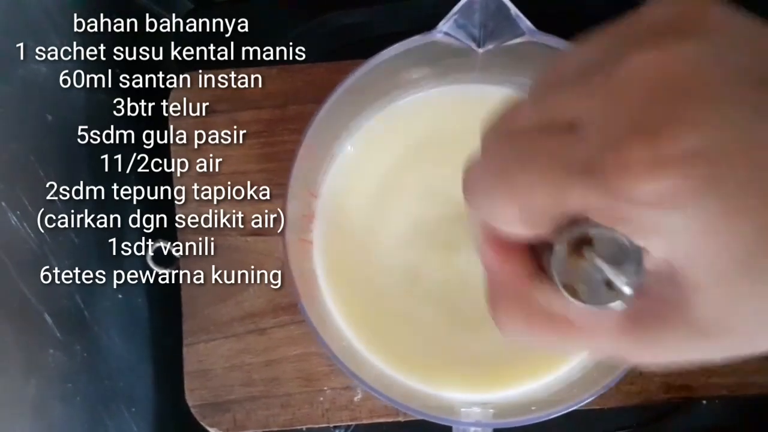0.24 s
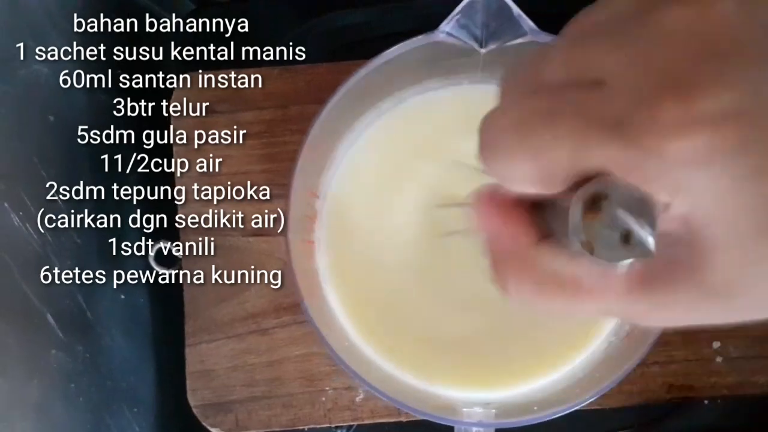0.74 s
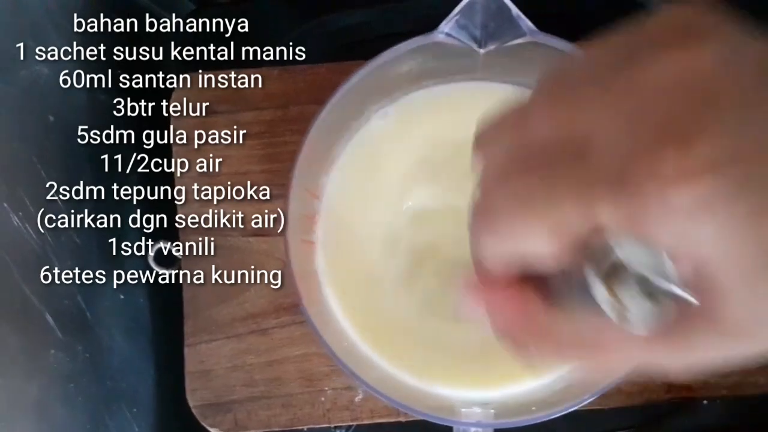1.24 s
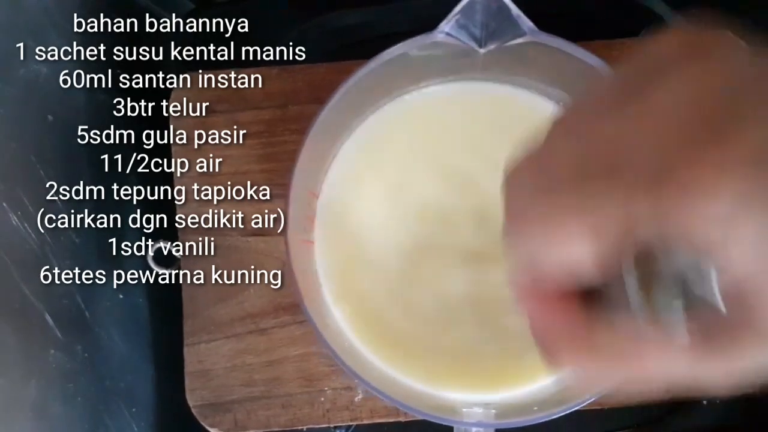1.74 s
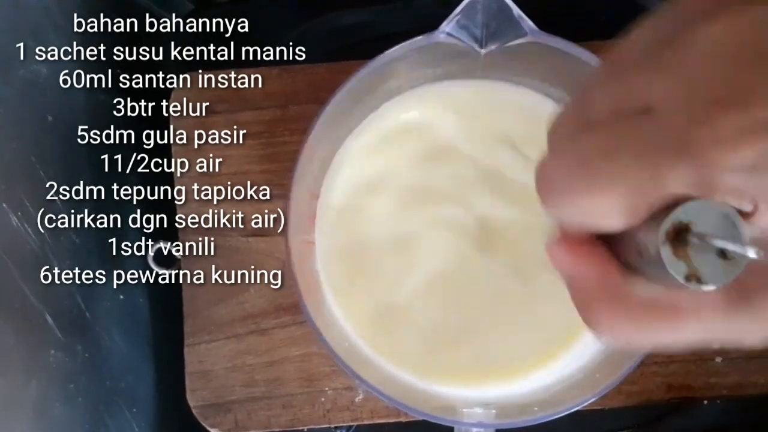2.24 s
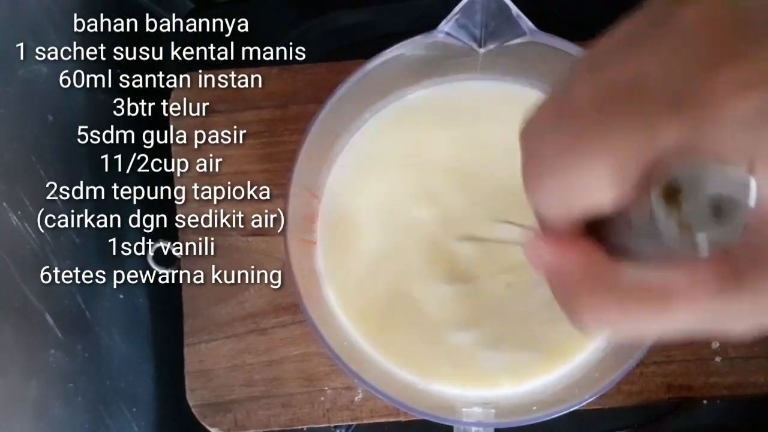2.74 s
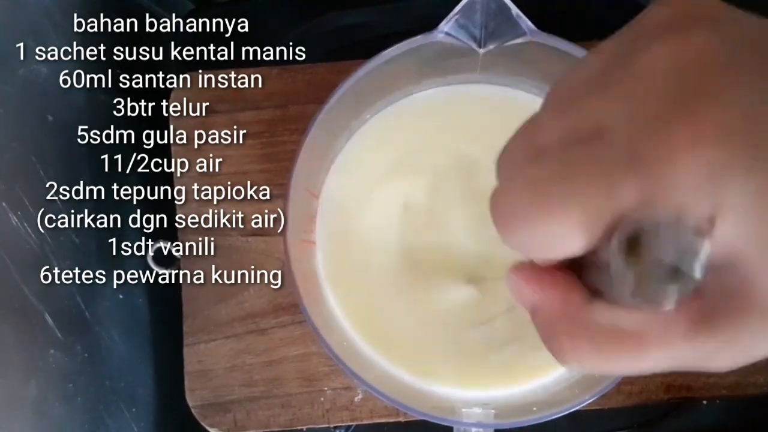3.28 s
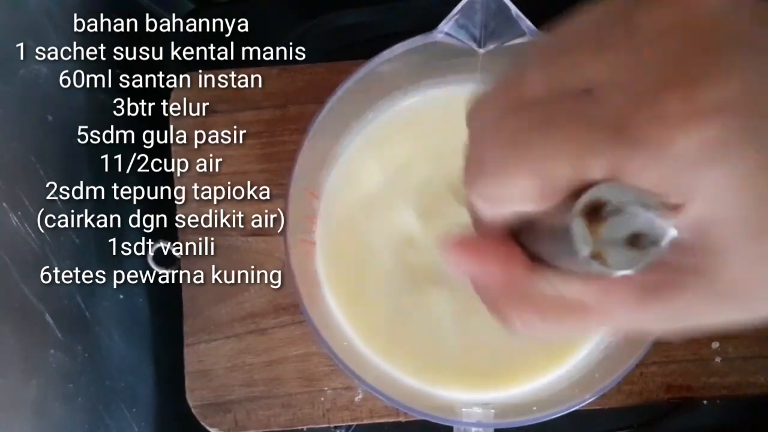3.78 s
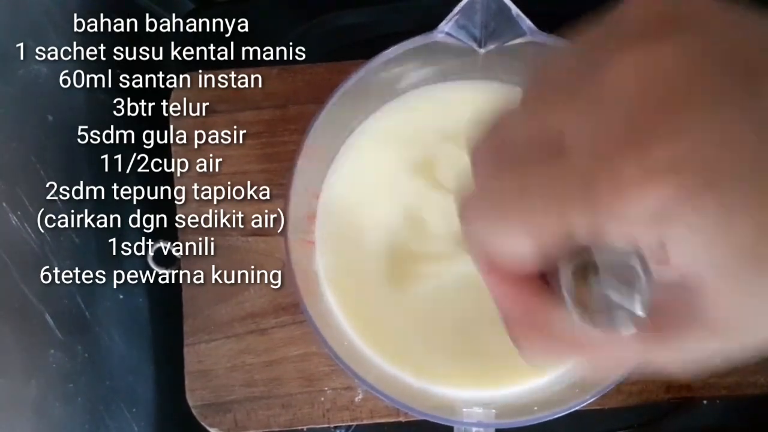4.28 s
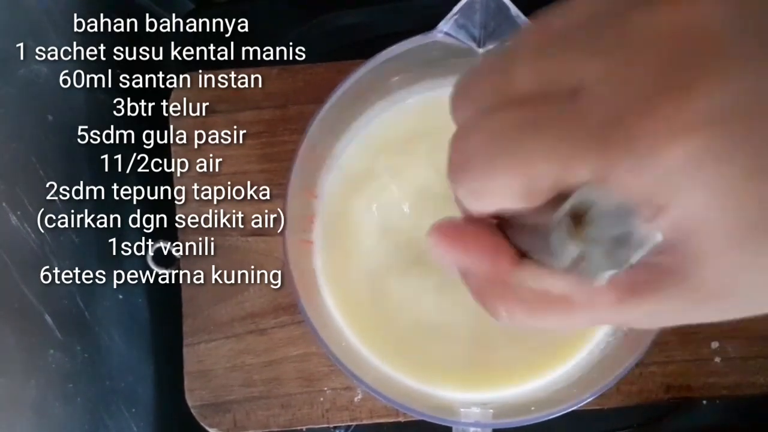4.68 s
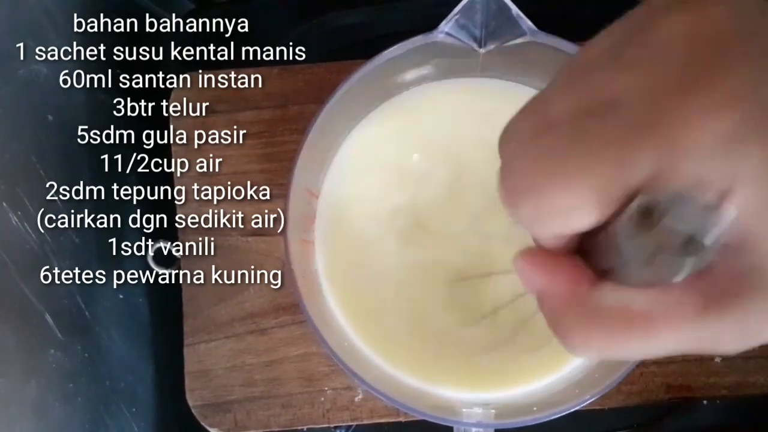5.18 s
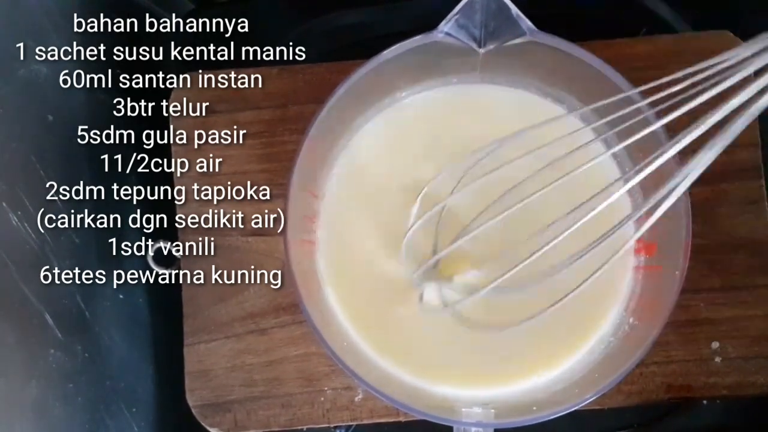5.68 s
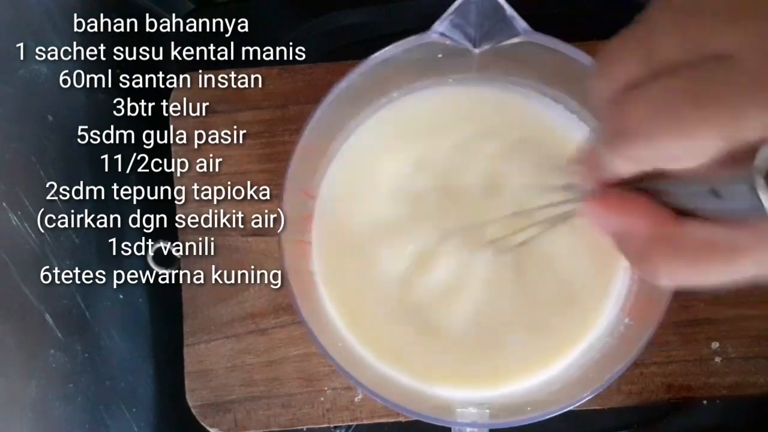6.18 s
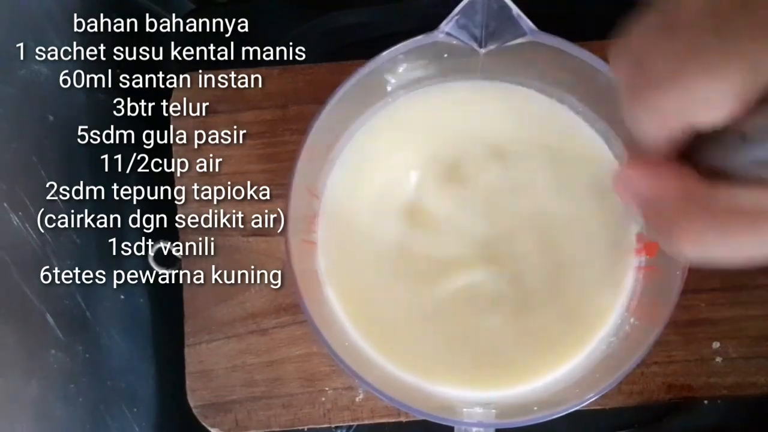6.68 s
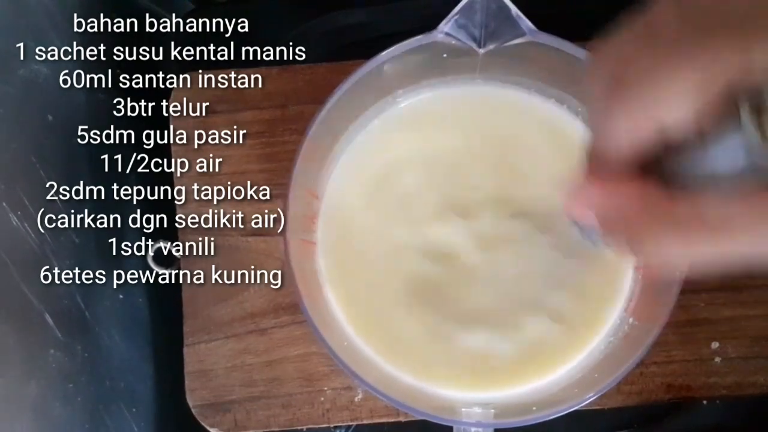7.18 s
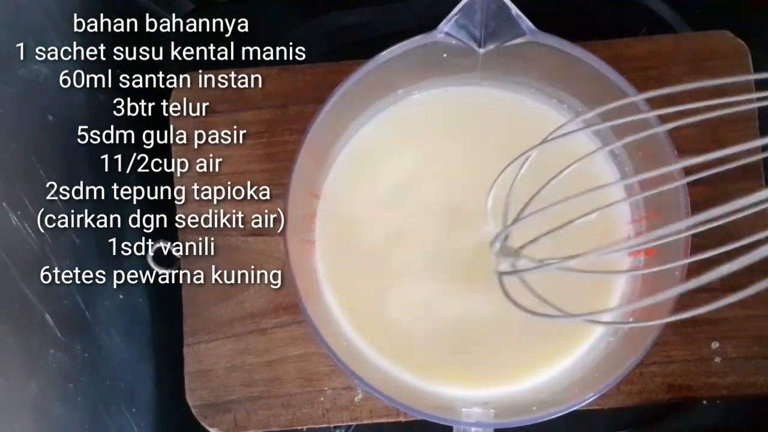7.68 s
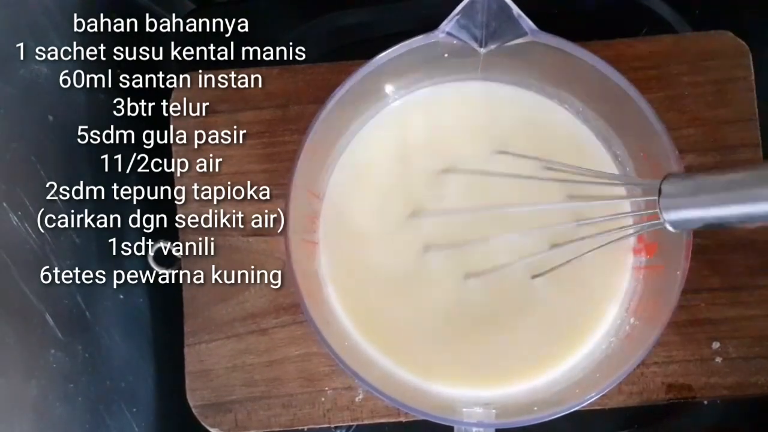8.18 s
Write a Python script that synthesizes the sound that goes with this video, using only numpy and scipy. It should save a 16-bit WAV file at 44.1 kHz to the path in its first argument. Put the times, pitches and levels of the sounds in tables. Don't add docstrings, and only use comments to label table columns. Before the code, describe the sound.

Thin loops of a metal whisk clatter against a plastic jug, bright and ringing, recorded very near in stereo. Loose scrambling stirs become regular back-and-forth strokes, with liquid slapping and small bubbles popping. A short gap, a second brief bout of beating, another quiet gap exposing low engine hum and road wash, then a last knock with a liquid slap. The room tail is short.

```python
import sys
import numpy as np
from scipy import signal
from scipy.fft import rfft, irfft, next_fast_len
from scipy.io import wavfile
from scipy.ndimage import uniform_filter1d

SR = 44100
rng = np.random.default_rng(int(sys.argv[2]) if len(sys.argv) > 2 else 0)


def volts_from_decibels(level):
    exponent = np.asarray(level, float) / 20
    return 10 ** exponent


def store_wav(level_fs):
    pcm = np.round(np.clip(np.atleast_2d(level_fs), -1, 1) * 32767)
    wavfile.write(sys.argv[1], SR, pcm.T.astype(np.int16))


N = 371763
T = np.arange(N) / SR

# [t/s, blow level/dB, jug ring level/dB, rattle length/ms]
STIRS = [(0.0373, -26, -6.5, 13), (0.059, -22.5, -5, 3.3), (0.0785, -23, -4.5, 3.7), (0.131, -25, -2, 7.3),
         (0.187, -33, -2, 14), (0.2633, -24.5, -7, 2.4), (0.2805, -29.5, -10, 4.9), (0.354, -33.5, -8, 13),
         (0.4235, -24.5, -1, 4.4), (0.432, -29, -22.5, 9.6), (0.516, -32, -12, 2.6), (0.5365, -29, -5, 4.9),
         (0.551, -23, -10, 2.1), (0.6136, -24, -3.5, 5.9), (0.652, -33, 3, 4), (0.6915, -32, 0, 4.4),
         (0.7192, -21, -15, 2.4), (0.8498, -31.5, -19, 2.1), (0.8626, -22, -10, 8), (0.939, -35.5, -5, 6.6),
         (0.9881, -22, 0, 5.5), (1.0105, -23.5, -13, 4), (1.0865, -23.5, -6, 5.6), (1.14, -27, -20.5, 4.6),
         (1.1535, -26.5, -22, 3.5), (1.1867, -21.5, -10, 3.9), (1.246, -38, 5, 5), (1.286, -27.5, -1, 5.7)]
# [t/s, blow level/dB, jug ring level/dB, rattle length/ms]
PICKUP = [(1.3966, -25.5, -9, 6.7), (1.431, -30.5, 0, 3.8), (1.446, -22, -10, 4.8), (1.479, -29, -10, 3.6),
          (1.506, -37.5, 10, 1.5), (1.532, -26.5, -4.5, 6.6), (1.578, -30, -7, 7), (1.6075, -31.5, -9, 4.1),
          (1.6947, -27, -19, 5), (1.707, -24, -8, 3.8), (1.723, -26.5, -7, 11), (1.7355, -32, -4, 3.7),
          (1.7786, -21.5, -11, 1.2), (1.953, -20.5, -11, 4.1), (2.0349, -26, -5.5, 7.7),
          (2.062, -28, -27, 2.9), (2.085, -34.5, -2.5, 7.8), (2.147, -28.5, 0.5, 8.4),
          (2.1757, -26, -24, 2.6), (2.246, -25.5, -2.5, 3.8), (2.2542, -24.5, -10, 2.8),
          (2.273, -33, -0.5, 12), (2.32, -29.5, -6, 4.4), (2.342, -27.5, -16, 4.8)]
# [t/s, blow level/dB, rattle length/ms]
FAR_UPRIGHT = [(2.397, -19, 6.7), (2.552, -15.5, 5.3), (2.7011, -23, 2.7), (2.8602, -19.5, 4.8),
               (2.9963, -24, 5.4), (3.135, -19.5, 4.8), (3.2703, -33, 10.7), (3.408, -14, 5),
               (3.5515, -19, 7.7), (3.715, -18.5, 4.6), (3.857, -17.5, 4.3), (4.004, -22, 6.6),
               (4.153, -20, 6), (4.2883, -17.5, 8.1), (4.435, -16.5, 6.6), (4.589, -30, 14),
               (4.7378, -20.5, 3.4), (4.8755, -23, 10), (5.0304, -34, 11), (5.168, -23, 7.8),
               (5.321, -26, 5.2), (5.477, -46, 23)]
# [t/s, blow level/dB, rattle length/ms]
FAR_TILTED = [(6.071, -19, 2.9), (6.215, -29, 9.7), (6.3823, -14.5, 3.8), (6.526, -16, 4.6),
              (6.6961, -36, 2.9), (6.829, -29, 13), (6.969, -20, 2.2), (7.1077, -26, 4),
              (7.283, -25.5, 5.2)]
# [t/s, blow level/dB, jug ring level/dB, rattle length/ms]
NEAR = [(2.4774, -28, 2.5, 4.1), (2.6243, -22, -7, 3.5), (2.7679, -28, -7, 3.4), (2.9218, -21, -12.5, 5.6),
        (3.0545, -17, -11.5, 7.3), (3.1904, -24.5, -5.5, 2.4), (3.3337, -26, -5.5, 10.4),
        (3.4833, -25, -7.5, 6.2), (3.64, -23.5, -15.5, 5.5), (3.7686, -27, -8, 7.5),
        (4.0728, -21, -11, 4.5), (4.213, -32.5, -14, 3.4), (4.3543, -26.5, -5.5, 6.4),
        (4.5004, -28, -12, 5.9), (4.6516, -26, -22, 3.2), (4.8081, -21.5, -7.5, 3.4),
        (4.9478, -29.5, -7, 6.3), (5.0886, -22.5, -13.5, 4.7), (5.2318, -23.5, -9.5, 6.7),
        (5.3918, -17.5, -7.5, 3.3), (5.5315, -19, -6.5, 3.4), (6.142, -30, -13, 6.2), (6.2909, -29, -17, 4),
        (6.4448, -28.5, -9, 5.5), (6.6099, -31.5, -22, 11), (6.7375, -25, -11, 7.3),
        (6.8927, -16.5, -9, 4.2), (7.038, -22.5, -3.5, 1.5), (7.208, -34, 0, 6.4), (7.3791, -31, -14, 2.3)]
# [t/s, blow level/dB, jug ring level/dB, rattle length/ms]
TRAILING = [(2.4155, -23.5, -13, 5.7), (2.4875, -21.5, -10, 4.7), (2.7843, -23.5, -9.5, 7.3),
            (3.0208, -34.5, 9.5, 3), (3.1976, -16.5, -6, 3.5), (3.3, -37, -11, 7.7), (3.424, -30, -3, 4),
            (2.7055, -13, -14.5, 5.4), (3.454, -34.5, -4, 2.8), (3.5781, -30.5, 6, 2.6), (3.73, -30, -3, 7),
            (3.7903, -25.5, -20, 4), (3.8733, -25.5, -4, 10.4), (3.938, -43.5, -11, 8.7),
            (4.0206, -25.5, -4, 3.4), (4.2223, -19.5, -4.5, 3.1), (4.304, -44, -3, 15),
            (4.471, -26, -1, 2.5), (4.6148, -27, 7, 3.1), (4.671, -22.5, -14, 3.1), (4.756, -28, 3, 6.8),
            (4.9646, -20, -11, 2), (5.0957, -31, -11, 4.6), (5.2495, -20, -15, 3.1), (5.34, -25, -12, 2.7),
            (5.3865, -20.5, -15.5, 3.5), (5.1045, -18, -10, 2.8), (5.219, -27.5, -6, 4.3),
            (6.301, -22, -13, 3.8), (6.4583, -21.5, -22, 3.4), (6.541, -39.5, 5, 3.8),
            (6.711, -28, -17, 1.5), (7.044, -19, -9.5, 5.4), (7.1298, -17, -9, 2.36)]
# [t/s, peak level/dB]
TICKS = [(0.024, -20.5), (0.205, -23.5), (0.2394, -24), (0.2924, -29.5), (0.3185, -16), (0.3401, -33.5),
         (0.3805, -25.5), (0.445, -15.5), (0.5018, -20), (0.6687, -20), (0.7024, -14.5), (0.7446, -18),
         (0.774, -28), (0.8365, -22.5), (0.9596, -30.5), (1.063, -21.5), (1.1263, -22.5), (1.1647, -18.5),
         (1.2201, -36), (1.3024, -19.5), (1.4045, -13), (1.4368, -18), (2.637, -28.5), (3.1544, -20.5),
         (3.304, -20), (4.3134, -22.5), (5.051, -25.5), (5.9794, -46), (6.5434, -16.5), (6.5919, -23.5),
         (6.8768, -23), (7.2868, -23), (8.314, -29.5)]
# [t/s, blow level/dB, jug ring level/dB, wire brightness/dB, rattle length/ms]
TOUCHES = [
    (5.959, -61, -10, 17, 1.8),
    (5.9958, -59, -13, 11, 5.1),
    (6.0254, -33.5, -1, -8, 7.4),
    (7.3434, -46.5, 9.5, -9, 14),
    (8.1561, -32, -11, -7, 2.6),
    (8.2055, -26, 6, 2, 4.1),
    (8.228, -21.5, -1, -6, 3.2),
    (8.306, -39, 4.5, -19, 6.6),
]
# [t/s, level/dB]
DRAG = [(0, -43), (.8, -43), (1.35, -44), (1.75, -45.5), (1.85, -87), (2.0, -51.5), (2.35, -46.5),
        (5.5, -45.5), (5.62, -60), (5.95, -90), (6.1, -45), (7.3, -47), (7.42, -68), (8.15, -69),
        (8.25, -46.5), (8.43, -73)]
# [t/s, peak level/dB, f/Hz]
KNOCKS = [(2.404, -27, 1520), (2.556, -24.5, 1360), (2.709, -28, 1430), (3.1397, -31.5, 1500),
          (3.194, -26, 1260), (3.2735, -34.5, 1470), (3.409, -30.5, 1360), (4.007, -32.5, 1410),
          (4.157, -32.5, 1410), (4.29, -35, 1420), (4.5907, -38, 1470), (5.034, -36, 1440),
          (6.0738, -25.5, 1323), (6.383, -19, 1367), (6.5277, -18, 1400), (7.2872, -26, 1270),
          (8.2054, -14, 1320), (8.207, -22, 900)]
# [t/s, peak level/dB, f/Hz]
PINGS = [(0.044, -21, 2234), (0.443, -23, 2180), (0.519, -26, 2230), (0.616, -22, 2200),
         (0.9931, -43, 1970), (1.0911, -27, 2070), (1.154, -23, 2150), (1.3972, -40, 2150),
         (1.7398, -21, 2160), (1.957, -29.5, 2060), (2.092, -25, 2210), (2.155, -20, 2230),
         (2.178, -28.5, 2180), (2.4014, -16, 2215), (2.558, -18, 2250), (2.704, -16.5, 2220),
         (2.8648, -17, 2210), (3.0054, -26, 2000), (3.062, -20.5, 2110), (3.1403, -27, 2150),
         (3.1938, -23, 2210), (3.2762, -26, 2100), (3.411, -11.5, 2224), (3.5571, -22, 2117),
         (3.641, -22, 2220), (3.7197, -20, 2170), (3.8646, -17, 2210), (4.007, -18, 2260),
         (4.156, -30, 2060), (4.29, -22, 2176), (4.4407, -19, 2170), (4.594, -23.5, 2200),
         (4.7401, -25, 2370), (4.877, -18.5, 2200), (5.032, -34, 2330), (5.1741, -28.5, 2300),
         (5.3961, -43, 2190), (5.517, -24, 2230), (6.386, -33, 2240), (6.532, -19.5, 2080),
         (6.744, -31, 2120), (6.833, -23, 2220), (6.973, -43, 2250), (6.994, -28, 2210), (7.111, -19, 2190),
         (7.2867, -36, 2160), (8.207, -38, 2160), (8.229, -19, 2150)]
# [t/s, peak level/dB, f/Hz]
SINGS = [(0.617, -22, 3810), (1.4024, -24, 3310), (1.73, -28, 3870), (2.0383, -31, 4080),
         (2.152, -21, 4580), (2.2546, -22, 3560), (2.4017, -18, 3670), (2.4798, -19.5, 4620),
         (2.5586, -22.5, 3750), (2.625, -21.5, 4760), (2.7084, -17, 3920), (2.861, -14, 3690),
         (2.9242, -16.5, 4510), (2.9972, -17.5, 3980), (3.057, -14, 3350), (3.141, -14, 3510),
         (3.1906, -16.5, 4100), (3.2728, -20.5, 3380), (3.411, -12, 3800), (3.4845, -28, 4200),
         (3.5586, -14, 3910), (3.642, -28, 4590), (3.7176, -18, 3910), (3.8577, -25, 3480),
         (4.0065, -24.5, 3920), (4.0755, -28.5, 4260), (4.155, -27.5, 4500), (4.224, -33, 4010),
         (4.293, -18, 3780), (4.4373, -13.5, 3780), (4.5925, -30, 3780), (4.7394, -25, 3750),
         (4.808, -24, 4360), (4.877, -23, 3870), (4.95, -19.5, 4420), (5.0918, -20.5, 4140),
         (5.1713, -18.5, 3980), (5.2356, -16, 4330), (5.395, -25.5, 4050), (5.5314, -28.5, 3850),
         (6.2183, -22.5, 3530), (6.3852, -16, 3780), (6.5315, -11, 3520), (6.8313, -18, 3880),
         (6.8924, -21, 3430), (6.9703, -27.5, 3450), (7.039, -20, 3640), (7.1135, -21, 3560),
         (7.381, -27.5, 4650)]
# [f/Hz, width/Hz, level/dB]
JUG = [(658, 76, -5.5), (1360, 120, 0), (1602, 250, -3), (2050, 240, -3), (2150, 160, 0), (2207, 86, 0.5)]
# [f/Hz, width/Hz, level/dB]
LOOPS = [(2925, 38, -9), (3403, 110, -5), (3910, 320, -0.5), (4500, 750, 0.5), (5050, 460, 0)]
# [f/Hz, width/Hz, level/dB]
OVERTONES = [(5900, 530, -4), (7380, 1000, -5), (9700, 410, -6), (11000, 1400, -13), (11830, 2700, -0.5)]
# [f/Hz, level per Hz/dB]
WIRE = [(3000, -30), (4500, 7), (6000, 0.5), (7300, 0), (9500, 5.5), (12300, 6.5), (15000, -8),
        (16100, -46)]
# [t/s, peak level/dB, f/Hz]
WAVES = [(2.425, -22, 340), (2.568, -25, 367), (2.728, -28, 363), (2.875, -29.5, 270), (3.03, -31, 277),
         (3.16, -27.5, 287), (3.306, -32.5, 300), (3.457, -28.5, 277), (3.58, -26, 355),
         (3.734, -27.5, 272), (3.885, -31.5, 365), (4.024, -29.5, 370), (4.171, -32, 389),
         (4.313, -23, 365), (4.476, -26.5, 277), (4.62, -27, 314), (4.764, -28, 277), (5.056, -31.5, 330),
         (5.215, -29, 277), (5.342, -25.5, 356), (5.484, -32, 272), (6.074, -25.5, 390),
         (6.231, -24.5, 376), (6.39, -25, 366), (6.546, -25.5, 350), (6.701, -31.5, 298), (6.838, -25, 270),
         (6.973, -27.5, 374), (7.135, -26.5, 376)]
# [t/s, peak level/dB, f/Hz]
GULPS = [
    (0.581, -31, 346),
    (0.997, -28.5, 352),
    (1.512, -29, 423),
    (2.153, -35, 277),
    (8.207, -17.5, 360),
]
# [f/Hz, width/Hz, level/dB]
BELLY = [(277, 3.9, -17.5), (356.4, 78, 0.5), (473, 1600, -3)]
# [t/s, peak level/dB]
BLOOPS = [(0.067, -31), (0.123, -29), (0.274, -40), (0.555, -37), (0.58, -30.5), (0.716, -32), (0.757, -29),
          (0.916, -29), (1.028, -38), (1.226, -30), (1.361, -31), (1.506, -30), (1.663, -28),
          (1.804, -34.5), (2.201, -38)]
# [t/s, engine firing f/Hz, firing level/dB, road wash level/dB]
STREET = [(0, 118.5, -36, -40), (.6, 106.6, -39, -40.5), (1.098, 94.5, -55, -38.5),
          (1.6, 93.4, -38.5, -38.5), (2, 83, -45.5, -44), (2.798, 78, -49.5, -43.5), (3.5, 96.8, -44, -45),
          (4.998, 82.7, -49.5, -48.5), (5.5, 70.6, -43, -43), (5.8, 68.6, -33, -46.5),
          (6.55, 71.1, -42, -39.5), (6.9, 68.23, -77, -39.5), (7.201, 66.95, -36, -38.5),
          (7.65, 61.65, -39.5, -37.5), (7.95, 60.7, -56.5, -38), (8.43, 59.7, -68, -37.5)]
# [f/Hz, level per Hz/dB]
ROAD = [(15, -37), (25, 2), (49, 0), (125, -0.5), (191, -4.5), (354, -11), (543, -11.5), (879, -15.5),
        (1310, -18.5), (12700, -47.5), (13600, -78)]
# [f/Hz, likeness/0-1]
LIKENESS = [(60, 1), (300, 0.88), (640, 0.03), (1400, 0.07), (6000, 0.4)]
# [f/Hz, left minus right level/dB]
PORT_LEAN = [(100, -0.5), (300, 0.3), (600, 1), (1300, -2), (2400, -0.3), (4500, 0), (8000, -3),
             (13000, 0.3)]

FAR_JUG_DB, FAR_JUG_PER_BLOW = -19, -0.6
FAR_WIRE_DB, NEAR_WIRE_DB, STIR_WIRE_DB, TRAIL_WIRE_DB = 1.5, 1.3, 0, 1
BRISK_DB, SOFT_DB = -2, 0.01
TICK_DB, TICK_JUG_DB, TICK_WIRE_DB, TICK_MS = -10, -6.5, 0.6, 3.25
FREE_S, FREE_DB = 0.03, -9
SLAP_AGAIN_S, SLAP_AGAIN_DB = 0.028, -6
KITCHEN_T60_S, KITCHEN_DB = 0.23, -15
LUG_DB, LUG_DB_PER_HZ = -45.5, -0.9141


def whisk():
    hits, drag = contacts(), dragging()
    ticks = chatter(12000, spread_db=1.3, alike=0.3)
    ticks = ticks * volts_from_decibels(2.2 * walk(160)[0])
    wall = ticks + 0.59 * ticks.mean(0)
    rattle = jug_wall(wall, hits, drag) + long_loops(ticks, hits, drag) + fine_wires(ticks, hits, drag)
    knocks = volts_from_decibels(-2.5) * notes(wall, KNOCKS, 2.2, 83.0)
    pings = volts_from_decibels(-3.0) * notes(wall, PINGS, 4.26, 85.0)
    sings = volts_from_decibels(-5.0) * notes(ticks, SINGS, 5.1, 140.0)
    return rattle, knocks + pings + sings


def jug_wall(wall, hits, drag):
    s, blow_db, jug_db, _, ms = hits
    push = bursts(s, blow_db + jug_db, 1.25 * ms) + volts_from_decibels(-8.0) * drag
    jug = body(wall * push, JUG, 3.63)
    jug = signal.lfilter(*signal.iirnotch(1090, 5., fs=SR), jug)
    return volts_from_decibels(-43.5) * band(jug, 598.0, 2650.0)


def long_loops(ticks, hits, drag):
    s, blow_db, _, _, ms = hits
    push = bursts(s, blow_db, ms) + volts_from_decibels(-6.0) * drag
    return volts_from_decibels(-40.0) * band(body(ticks * push, LOOPS, 2.85), 2420.0, 7440.0)


def fine_wires(ticks, hits, drag):
    s, blow_db, _, wire_db, ms = hits
    fine = ticks * (bursts(s, blow_db + wire_db, 0.68 * ms) + volts_from_decibels(-9.0) * drag)
    overtones = band(body(fine, OVERTONES, 6.36), 5130.0, 14460.0)
    return volts_from_decibels(5.5) * colour(fine, WIRE) + volts_from_decibels(-44.5) * overtones


def contacts():
    s, blow_db, ms = np.transpose(FAR_UPRIGHT + FAR_TILTED)
    far = np.c_[s, blow_db, FAR_JUG_DB + FAR_JUG_PER_BLOW * blow_db, ms]
    strokes = ((far, FAR_WIRE_DB), (NEAR, NEAR_WIRE_DB),
               (STIRS + PICKUP, STIR_WIRE_DB), (TRAILING, TRAIL_WIRE_DB))
    rows = []
    for table, wire_db in strokes:
        s, blow_db, jug_db, ms = np.transpose(table)
        bright_db = wire_db + BRISK_DB * np.log2(ms / ms.mean()) + SOFT_DB * (blow_db - blow_db.mean())
        rows.append(np.c_[s, blow_db, jug_db, bright_db, ms])
    rows.append([(s, db + TICK_DB, TICK_JUG_DB, TICK_WIRE_DB, TICK_MS) for s, db in TICKS])
    return np.vstack(rows + [TOUCHES]).T


def chatter(rate_hz, spread_db, alike):
    size = (rng.random(N) < rate_hz / SR) * volts_from_decibels(spread_db * rng.exponential(size=N))
    shared, left, right = rng.standard_normal((3, N))
    return unit(size * (alike * shared + np.array([left, right])))


def bursts(times_s, levels_db, lengths_ms):
    env, t_ms = np.zeros(N + 4096), np.arange(4096) / SR * 1000
    for s, db, ms in zip(times_s, levels_db, lengths_ms):
        i, u = int(s * SR), t_ms / np.clip(ms, 1, 14)
        swell = 0.093 + np.tanh(1.07 * u)
        env[i:i + 4096] += volts_from_decibels(db - 3.5) * swell * np.exp(-(u / 1.824) ** 1.11)
    return env[:N]


def dragging():
    s = np.transpose(FAR_UPRIGHT + FAR_TILTED)[0]
    until_s = s[np.minimum(np.searchsorted(s, T), len(s) - 1)] - T
    free_db = FREE_DB * np.clip(2 - until_s / FREE_S, 0, 1) * (until_s > 0)
    return volts_from_decibels(np.interp(T, *np.transpose(DRAG)) + free_db + 4.17 * walk(140)[0])


def notes(ticks, table, push_ms, width_hz):
    out, u = np.zeros((2, N + 2048)), np.arange(2048) / SR * 1000 / push_ms
    push = np.tanh(3.9 * u) * np.exp(-u ** 1.45)
    ticks = np.pad(ticks, ((0, 0), (0, 2048)), mode="reflect")
    for s, db, hz in table:
        i = int(s * SR)
        note = ring(ticks[:, i:i + 2048] * push, hz, width_hz)
        note = ring(note, hz, 2.2 * width_hz).imag
        out[:, i:i + 2048] += volts_from_decibels(db) * note / np.max(np.abs(note.mean(0)))
    return out[:, :N]


def batter():
    slaps = GULPS + WAVES
    out, t = np.zeros((2, N + 4096)), np.arange(4096) / SR
    again = volts_from_decibels(SLAP_AGAIN_DB) * np.exp(-np.abs(t - SLAP_AGAIN_S) / 0.00058)
    thump = volts_from_decibels(7.5) * (np.exp(-t / 0.00092) + again)
    rough = rng.standard_normal((len(slaps), 2, 4096))
    for (s, db, hz), (shared, own) in zip(slaps, rough):
        wake = np.exp(-t / 0.041) * (shared + 0.5 * own * np.array([[1], [-1]]))
        push = wake + thump
        boom = ring(push, hz, 27.0).imag
        boom = boom + sum(volts_from_decibels(d) * ring(push, f, w).imag for f, w, d in BELLY)
        i = int(s * SR)
        out[:, i:i + 4096] += volts_from_decibels(db + 2.5) * boom / np.max(np.abs(boom))
    return band(out[:, :N], 180.0, 1800.0)


def slosh():
    swirl = dragging() ** 1.222 * rng.standard_normal(N)
    return volts_from_decibels(-28.0) * band(body(swirl, BELLY, 0.54), 200.0, 1300.0)


def bubbles():
    out, t = np.zeros(N), np.arange(1024) / SR
    for when, pitch, size in rng.random((260, 3)):
        i, hz = int(when * (N - 1024)), 240.0 * 3.5 ** pitch
        bubble = np.sin(2 * np.pi * hz * (t + 4.5 * t ** 2))
        bubble *= np.exp(-t * hz / 3.8) * (1 - np.exp(-t / 0.0019))
        level_db = np.interp(when * N / SR, *np.transpose(DRAG)) + 9.5 - 8.2 * size
        out[i:i + 1024] += volts_from_decibels(level_db) * bubble
    return out


def bloops():
    out, t = np.zeros(N), np.arange(1024) / SR
    bloop = np.sin(2 * np.pi * 330 * (t + 170 * t ** 2))
    bloop *= np.exp(-(t / .0045) ** 2) * (1 - np.exp(-t / .0008))
    for s, db in BLOOPS:
        i = int(s * SR)
        out[i:i + 1024] += volts_from_decibels(db + 0.5) * bloop
    return out


def kitchen(x):
    t = np.arange(SR // 2) / SR
    tail = rng.standard_normal((2, len(t))) * np.exp(-np.log(1000) * t / KITCHEN_T60_S) * (t > .004)
    tail = signal.lfilter([1], [1, -.4], tail)
    tail = tail / np.sqrt(np.sum(tail[0] ** 2))
    return volts_from_decibels(KITCHEN_DB) * signal.fftconvolve(x, tail, axes=1)[:, :N]


def street():
    s, *columns = np.transpose(STREET)
    firing_hz, firing_db, wash_db = (np.interp(T, s, c) for c in columns)
    return engine(firing_hz, firing_db) + road_wash(wash_db)


def engine(firing_hz, firing_db):
    phase = 2 * np.pi * np.cumsum(firing_hz * (1 + 0.0342 * walk(12)[0])) / SR
    drone = volts_from_decibels(firing_db - 4.0 + 1.7 * walk(6.5)[0]) * np.sin(phase)
    lug_db = LUG_DB + LUG_DB_PER_HZ * (firing_hz - 60.0) + 2.5 * walk(14)[0]
    drone += volts_from_decibels(lug_db) * np.sin(2 * phase)
    return drone * volts_from_decibels(np.array([[-.5], [.5]]))


def road_wash(wash_db):
    like_hz, like = np.transpose(LIKENESS)
    like = np.clip(like, 0, .999)
    mid, side = (colour(rng.standard_normal(N), ROAD) for _ in range(2))
    scale = np.std(mid)
    mid = colour(mid, np.c_[like_hz, 10 * np.log10(1 + like)])
    side = colour(side, np.c_[like_hz, 10 * np.log10(1 - like)])
    wash = (mid + side * np.array([[1], [-1]])) / scale
    tyres = band(wash, 1800.0, 18000.0) * volts_from_decibels(3.78 * wash_db + 80.0)
    return wash * volts_from_decibels(wash_db - 5.0 + walk(11.0)[0]) + tyres


def body(x, modes, spot_db):
    out = np.zeros((2, N))
    for hz, width_hz, db in modes:
        both, left, right = walk(48, count=3)
        spot = volts_from_decibels(spot_db * (both + 0.79 * np.array([left, right])))
        out += volts_from_decibels(db) * np.sqrt(width_hz) * ring(x * spot, hz, width_hz).imag
    return out


def ring(x, hz, width_hz):
    return signal.lfilter([1], [1, -np.exp((2j * np.pi * hz - np.pi * width_hz) / SR)], x)


def walk(rate_hz, count=1):
    k = int(SR / rate_hz)
    steps = np.repeat(rng.standard_normal((count, N // 200))[:, :N // k + 1], k, axis=1)
    return uniform_filter1d(uniform_filter1d(steps, k), k)[:, :N]


def colour(x, points):
    hz, db = np.transpose(points)
    size = next_fast_len(N)
    log_f = np.log(np.maximum(np.arange(size // 2 + 1) * SR / size, 1))
    gain = volts_from_decibels(np.interp(log_f, np.log(hz), db))
    return irfft(rfft(x, size) * gain, size)[..., :N]


def band(x, low_hz, high_hz):
    return signal.sosfilt(signal.butter(3, [low_hz, high_hz], "band", fs=SR, output="sos"), x)


def unit(x):
    return x / np.sqrt(np.mean(x ** 2))


def scene():
    rattle, sung = whisk()
    room = kitchen(rattle + volts_from_decibels(-5.0) * sung)
    return rattle + sung + batter() + slosh() + bubbles() + bloops() + room + street()


def band_limit(x):
    return signal.sosfilt(signal.butter(12, 16640, fs=SR, output="sos"), x)


def record(dry):
    hz, db = np.transpose(PORT_LEAN)
    left = colour(dry[0], np.c_[hz, db / 2])
    right = np.roll(colour(dry[1], np.c_[hz, -db / 2]), shift=3)
    mix = band(np.tanh(np.array([left, right])), 42.4, 15740.0)
    return band_limit(mix)


dry = scene()
out = record(dry)
store_wav(out)
```